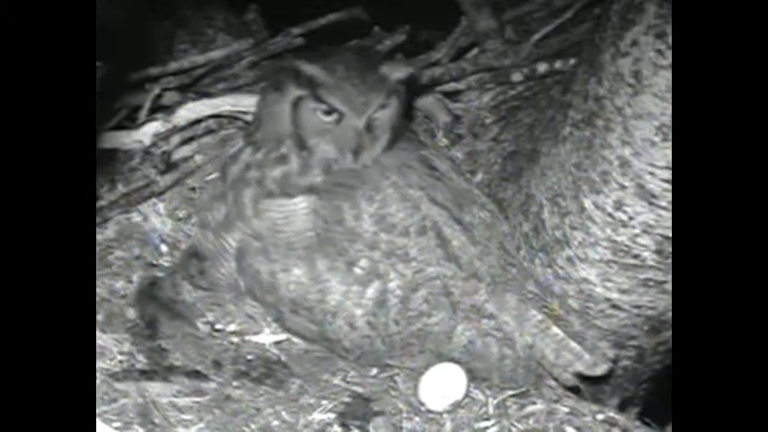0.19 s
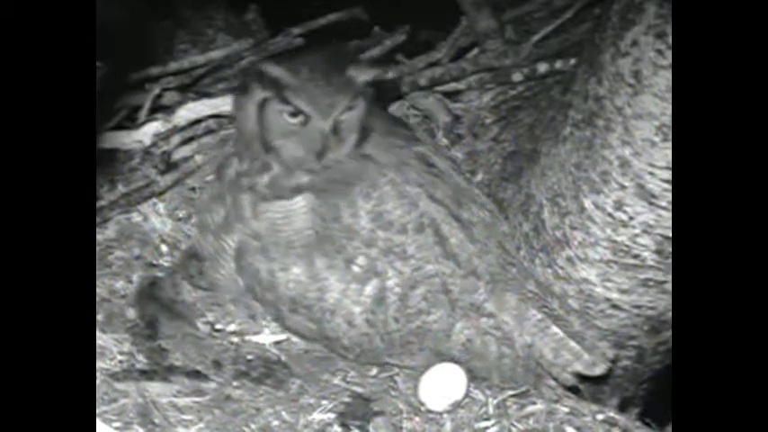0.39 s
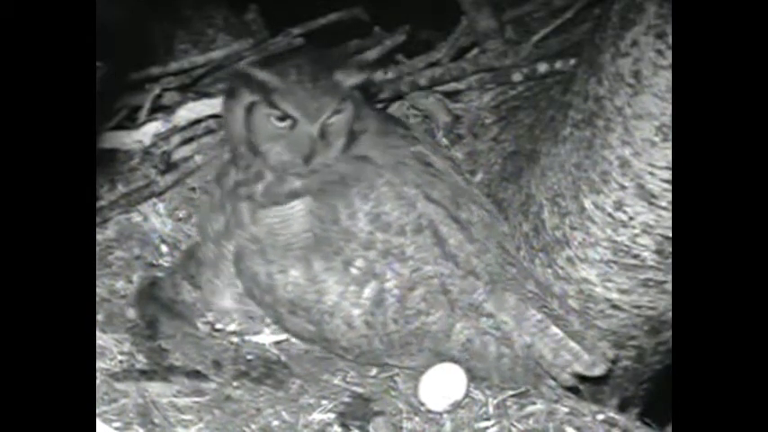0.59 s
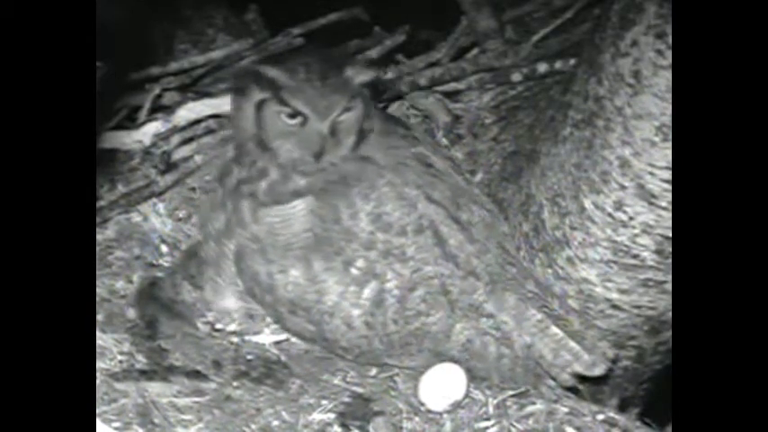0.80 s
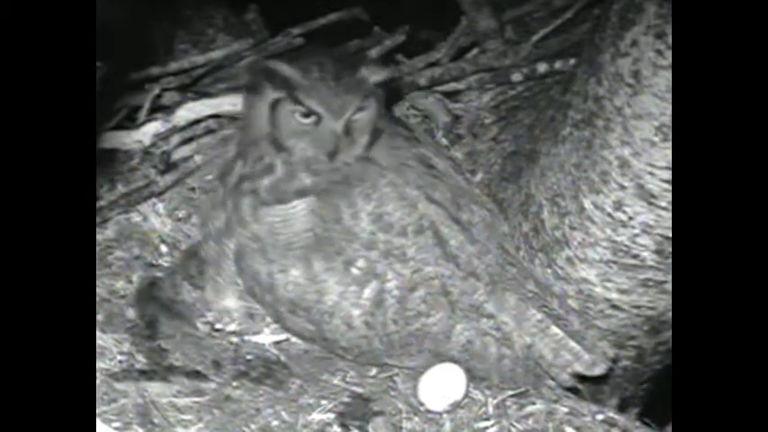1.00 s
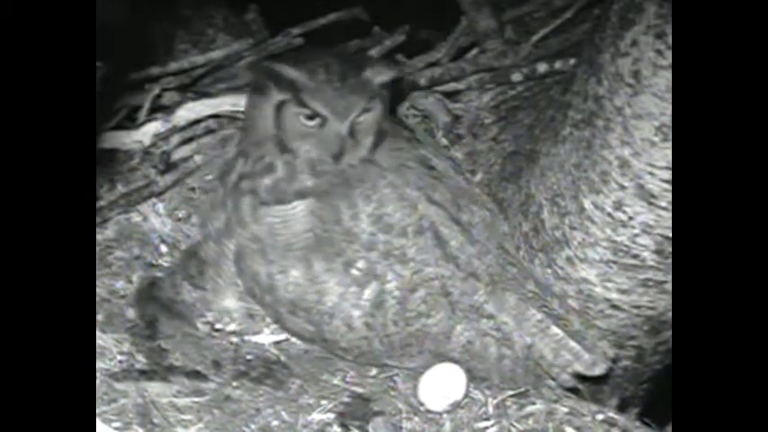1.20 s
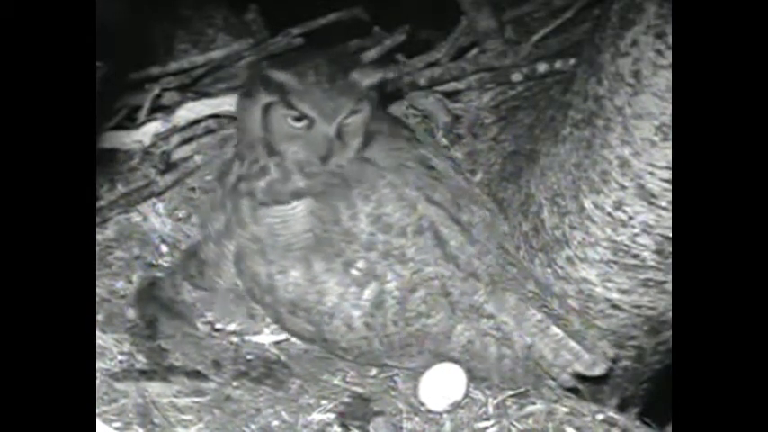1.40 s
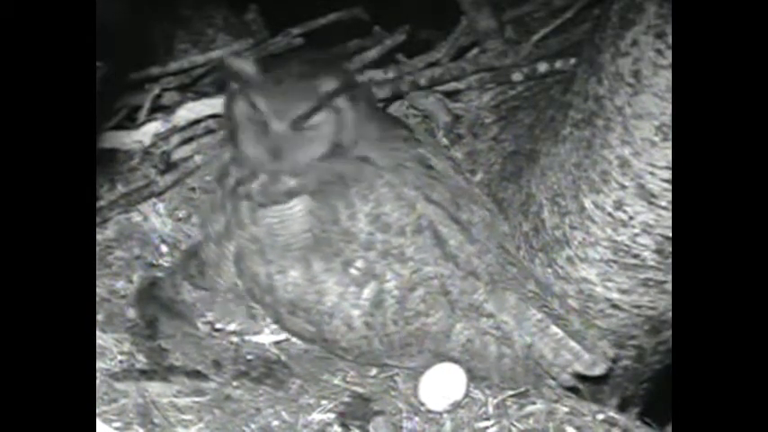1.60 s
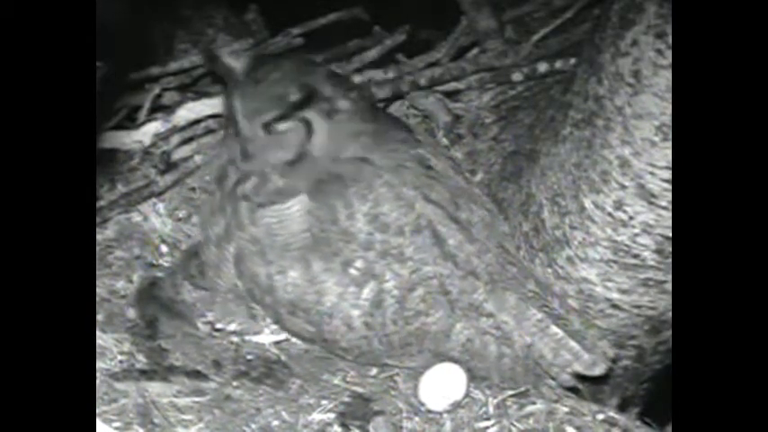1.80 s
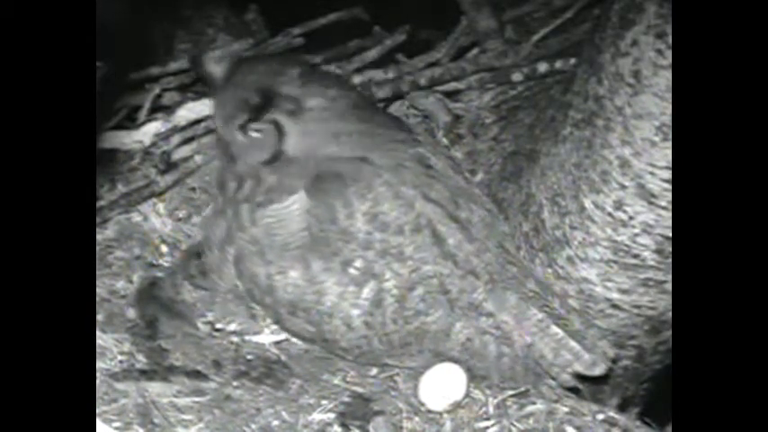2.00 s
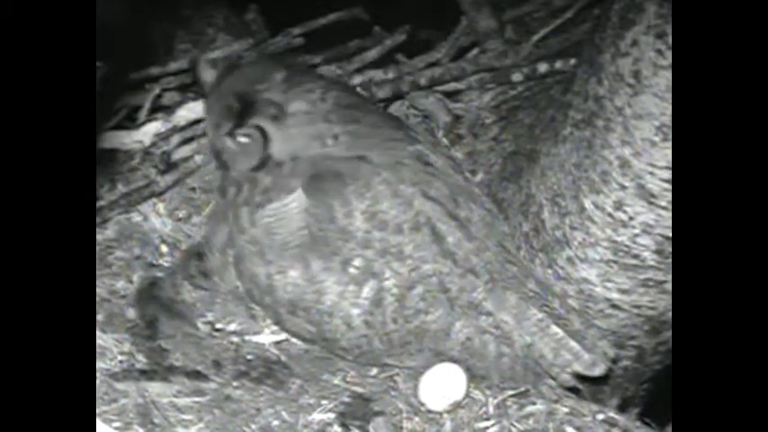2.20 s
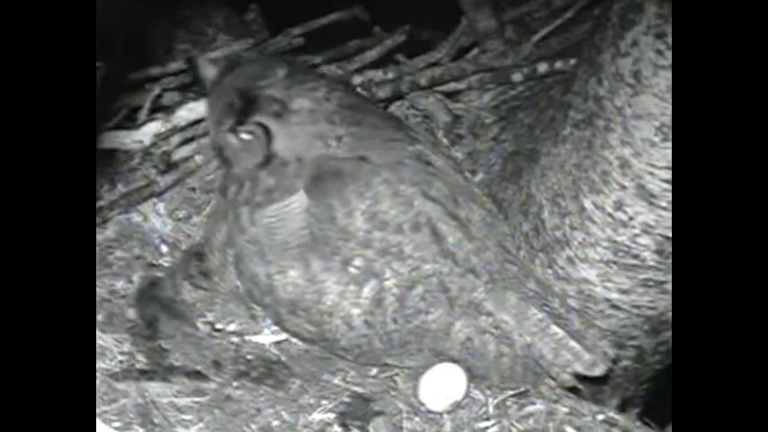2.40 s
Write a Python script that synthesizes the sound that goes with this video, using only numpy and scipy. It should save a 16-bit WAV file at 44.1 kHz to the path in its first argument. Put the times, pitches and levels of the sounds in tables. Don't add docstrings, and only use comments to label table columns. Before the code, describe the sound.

One brief soft owl hoot at a night nest, with microphone hiss, small taps and ticks

```python
import sys
import numpy as np
from scipy import signal
from scipy.fft import rfft, irfft
from scipy.io import wavfile
from scipy.ndimage import uniform_filter1d

SR = 44100
rng = np.random.default_rng(int(sys.argv[2]) if len(sys.argv) > 2 else 0)


def to_wav(s):
    ch = np.atleast_2d(s).T
    pcm = np.round(np.clip(ch, -1, 1) * 32767)
    wavfile.write(sys.argv[1], SR, pcm.astype(np.int16))


def ratio(d):
    e = np.asarray(d, float) / 20
    return 10 ** e


N = 105840

# frequency in Hz, level in dB per Hz.
WASH_SPECTRUM = [(12, -63), (20, -43.5), (54, -48), (173, -24.5), (422, 0.5), (460, -3), (527, -1.5),
                 (809, -11.5), (1200, -24.5), (1560, -69.5), (2640, -120)]
# time in seconds, wash level in dB, gust level in dB.
NIGHT_AIR = [(0, 1.5, -2), (.2, -0.5, 4.5), (.45, 4, -8), (.63, 2, 14), (.8, 1, 7), (1.05, 2, -4),
             (1.22, 1.5, 14), (1.33, -1.5, 9.5), (1.43, 5, 13.5), (1.55, 1, 7.5), (1.7, -2, 10),
             (1.9, -1, -1), (2.15, 2, -10), (2.4, -1.5, -9)]
# frequency in Hz, level in dB per Hz.
HISS_SPECTRUM = [(500, -11.5), (1000, 0), (2000, -2), (3000, -5.5), (4500, -10), (7200, -11), (8800, -17),
                 (9900, -27.5)]
# time in seconds, level in dB.
LID_ACTIVITY = [(0.0, -55), (0.28, -84), (0.44, -62.5), (0.65, -67), (1.2, -67.5), (1.59, -68.5),
                (1.85, -65), (1.92, -64), (2.4, -68)]
# start in seconds, peak in dB, pitch in Hz, length in seconds.
LID_TICKS = [(0.047, -51.5, 2370, 0.0065), (0.01, -50.5, 2330, 0.0049), (0.09, -57.5, 2390, 0.004),
             (0.13, -61, 2310, 0.0035), (0.166, -51.5, 2310, 0.0031), (0.318, -57, 2360, 0.0059),
             (0.3505, -41.5, 2336, 0.0023), (0.418, -48.5, 2110, 0.0028), (0.43, -49.5, 2250, 0.0049),
             (0.472, -49.5, 2160, 0.0043), (0.495, -52, 2270, 0.0048), (0.45, -48.5, 2360, 0.0034),
             (0.53, -62, 2300, 0.004), (0.5704, -52.5, 2420, 0.005), (0.609, -47.5, 2290, 0.007),
             (0.802, -51.5, 2390, 0.0027), (0.838, -49.5, 2310, 0.0022), (0.874, -49, 2440, 0.0021),
             (0.909, -49.5, 2210, 0.004), (1.036, -54, 2430, 0.004), (1.05, -52.5, 2430, 0.0032),
             (1.125, -55, 2310, 0.004), (1.4317, -50, 2263, 0.0065), (1.432, -56, 2490, 0.003),
             (1.462, -48.5, 2250, 0.0048), (1.505, -49, 2220, 0.0032), (1.519, -50.5, 2170, 0.0043),
             (1.605, -53, 2415, 0.004), (1.611, -43.5, 2440, 0.0017), (1.612, -48, 2600, 0.0013),
             (1.801, -50, 2090, 0.0027), (1.8915, -46.5, 2290, 0.0025), (1.976, -47, 2370, 0.0044),
             (2.033, -50, 2316, 0.0056), (2.084, -54, 2210, 0.0029), (2.1044, -50.5, 2250, 0.0041),
             (2.136, -54, 2280, 0.0037)]
# frequency in Hz, level in dB, t60 in seconds, delay in seconds.
HOUSING_MODES = [
    (355, 2.5, 0.12, 0),
    (535, 3, .07, .005),
    (440, 0, 0.05, 0),
    (290, -12, 0.04, 0),
    (666, -13, 0.04, 0),
]
# start in seconds, peak in dB, upper mode share in dB, low
# mode in Hz.
DRIPS = [
    (0.512, -29, 0, 340),
    (0.627, -33, -4, 335),
    (1.343, -35, -1, 350),
    (1.492, -33.5, 0, 352),
    (1.769, -28, -1, 372),
    (1.794, -35.5, -9, 405),
    (2.13, -28, -2, 342),
         (0.061, -40.5, 0, 380), (0.081, -45.5, -11, 429), (0.152, -40, -1.5, 607), (0.678, -43, -11, 373),
          (0.71, -38.5, -14, 359), (0.735, -43.5, -17, 362), (0.839, -49, -3, 554), (0.881, -43.5, -1, 421),
          (0.925, -36, -14, 425), (0.973, -39.5, -4, 437.5), (1.032, -39.5, -9, 424),
          (1.09, -42.5, -8, 516), (1.151, -42.5, -12, 430), (1.173, -37.5, -13, 336.5),
          (1.209, -41, -6, 381), (1.232, -41.5, -11, 430), (1.272, -40, -9, 381), (1.329, -40.5, -8, 490),
          (1.626, -47, -16, 484), (1.646, -43, -13, 480), (1.7, -48, -1, 488), (1.74, -38.5, -18, 439),
          (1.827, -48.5, 5, 560), (1.9, -48, -8, 442), (1.971, -38.5, -6, 530), (2.003, -49, -1, 526),
          (2.044, -41, -9, 538), (2.365, -43, 2, 402), (2.378, -38, -4.5, 517)]
# time in seconds, pitch in Hz, level in dB.
HOOT = [
    (.243, 436, -41),
    (.27, 415, -40),
    (.281, 405, -35.5),
    (.318, 383, -34),
    (.348, 411, -30.5),
    (.383, 408, -31),
    (.398, 423, -30.5),
    (.466, 430, -32),
    (.481, 452, -41),
]
# start in seconds, length in seconds, pitch in Hz, level in dB.
VOICE_CATCHES = [
    (.205, .034, 430, -43),
    (.481, .014, 458, -38),
    (.496, .018, 460, -41),
]


def noise():
    return rng.standard_normal(N)


def along(table, column):
    rows = np.transpose(table)
    return np.interp(np.arange(N) / SR, rows[0], rows[column])


def evened(x):
    return x / np.sqrt(np.mean(x ** 2) + 1e-20)


def coloured(x, points):
    f, db = np.transpose(points)
    log_hz = np.log(np.fft.rfftfreq(len(x), 1 / SR) + 1)
    beyond = np.maximum(log_hz - np.log(f[-1]), 0) + np.maximum(np.log(f[0]) - log_hz, 0)
    gain_db = np.interp(log_hz, np.log(f + 1), db) - 12 * beyond
    return irfft(rfft(x) * ratio(gain_db), len(x))


def high_pass(x, order, hz):
    return signal.sosfilt(signal.butter(order, hz, "high", fs=SR, output="sos"), x)


def drift(width_s):
    size = max(round(width_s * SR), 2)
    return evened(uniform_filter1d(uniform_filter1d(noise(), size), size))


def resonate(x, hz, width):
    turn = np.exp(2j * np.pi * np.cumsum(hz * np.ones(len(x))) / SR)
    r = np.exp(-np.pi * width / SR)
    return 2 * (turn * signal.lfilter([1 - r], [1, -r], x / turn)).real


def resonate_twice(x, hz, width):
    return resonate(resonate(x, hz, width), hz, width)


def ring(hz, t60, rise):
    t = np.arange(8000) / SR
    return (1 - np.exp(-t / rise)) ** 2 * ratio(-60 * t / t60) * np.sin(2 * np.pi * hz * t)


def add(mix, s, sound):
    part = mix[round(s * SR):][:len(sound)]
    part += sound[:len(part)]


def wash():
    z = signal.stft(coloured(noise(), WASH_SPECTRUM), nperseg=1024, noverlap=768)[2]
    chance = rng.standard_normal(z.T.shape).T
    patch_db = 2 * evened(uniform_filter1d(uniform_filter1d(chance, 4, 0), 10, 1))
    x = signal.istft(z * ratio(patch_db), nperseg=1024, noverlap=768)[1][:N]
    return ratio(-51.5 + along(NIGHT_AIR, 1)) * evened(x)


def gusts():
    low = high_pass(resonate_twice(noise(), hz=193.6, width=300), 3, 125)
    lumps_db = 3.5 * drift(0.01)
    return ratio(-79 + along(NIGHT_AIR, 2) + lumps_db) * evened(low)


def hiss():
    turns = np.arange(N) * 120 / SR + 1.3
    even = np.diff(np.floor(turns / 2), prepend=0)
    odd = np.diff(np.floor(turns / 2 + .5 + 0.054), prepend=0)
    spikes = even + ratio(-2.5) * odd
    puffs = signal.lfilter([1], [1, -.93], spikes) * noise()
    buzz = high_pass(coloured(puffs, HISS_SPECTRUM), 4, 6900)
    steady = evened(coloured(noise(), HISS_SPECTRUM))
    return ratio(-58 + 0.54 * drift(0.11)) * steady + ratio(-74) * evened(buzz)


def patter():
    drips_per_s, lid_hz, lid_width_hz = 260, 2310, 310
    spread_db = -4.5 * np.minimum(rng.exponential(1, (2, N)), 3)
    size = rng.standard_normal((2, N)) * ratio(spread_db)
    hits = size * (rng.random((2, N)) < drips_per_s / SR)
    response = sum(ratio(db) * ring(hz, t60, 0.0047) for hz, db, t60, _ in HOUSING_MODES)
    housing = evened(signal.oaconvolve(hits[0], response)[:N])
    lid = resonate(hits[1], lid_hz + 70 * drift(0.018), lid_width_hz)
    lid = evened(resonate(lid, lid_hz, lid_width_hz))
    return ratio(-61) * housing + ratio(-2.5 + along(LID_ACTIVITY, 1)) * lid


def ticks():
    out, t = np.zeros(N), np.arange(-1200, 1200) / SR
    u = t - 0.0033
    slowness = np.where(u < 0, 2.64, 1)
    chance = rng.standard_normal((len(LID_TICKS), 2, len(t)))
    for (s, db, hz, length), (grit, puff) in zip(LID_TICKS, chance):
        shape = np.exp(-(u / slowness / max(length, .001)) ** 2)
        grain = evened(resonate_twice(grit, hz, 350))
        wide = evened(resonate_twice(puff, 0.58 * hz, 1200))
        scrape = np.sin(2 * np.pi * hz * t) + .6 * grain + ratio(-8) * wide
        add(out, s + t[0], ratio(db - 6.5) * shape * scrape)
    return out


def knocks():
    drips = DRIPS
    out, shake = np.zeros(N), np.zeros(N)
    rattle_db, rattle_t60_s = -19, .18
    decay_db = -60 * np.arange(8000) / SR / rattle_t60_s
    chance = rng.standard_normal((len(drips), len(HOUSING_MODES)))
    for (s, db, upper_db, low_hz), c in zip(drips, chance):
        add(shake, s + 0.0052, ratio(db + rattle_db + decay_db))
        for k, (hz, mode_db, t60, late) in enumerate(HOUSING_MODES):
            mode_hz = hz * (1 + 0.016 * c[k]) if k else low_hz
            mode = ring(mode_hz, t60, .0012 + late / 3)
            level_db = db - 4 + mode_db + upper_db * (k > 0)
            add(out, s - 0.00096 + late, ratio(level_db) * mode)
    rattle = sum(ratio(db) * resonate_twice(noise(), hz, 110) for hz, db, *_ in HOUSING_MODES)
    return out + uniform_filter1d(shake, size=300) * evened(rattle)


def hoot():
    t, hz = np.arange(N) / SR, along(HOOT, 1)
    level_db = along(HOOT, 2) + .4 * drift(0.01)
    gate = np.clip(np.minimum(t - HOOT[0][0], HOOT[-1][0] - t) / .005, 0, 1)
    phase = 2 * np.pi * np.cumsum(hz + 2 * drift(0.004)) / SR
    tone = np.sqrt(2) * (np.sin(phase) + ratio(-36) * np.sin(2 * phase))
    upper = evened(resonate_twice(noise(), 3 * hz / 2, 24))
    upper = upper * ratio(-18.5) * np.exp(-((t - .36) / .04) ** 2)
    breath = evened(resonate(resonate(noise(), 1.3 * hz, 220), 1.44 * hz, 220))
    voice = gate * ratio(level_db) * (tone + upper + ratio(-21) * breath)
    for s, length, catch_hz, db in VOICE_CATCHES:
        swell = np.sin(np.pi * np.clip((t - s) / length, 0, 1))
        voice = voice + ratio(db) * np.sqrt(2) * swell * np.sin(2 * np.pi * catch_hz * t)
    return voice


def scene():
    near = high_pass(patter() + ticks() + knocks() + hoot(), 3, 237)
    return (wash() + gusts() + hiss() + near)[None]


def low_pass(x):
    return signal.sosfilt(signal.butter(12, 9890, fs=SR, output="sos"), x)


def record(dry):
    band_limit = signal.firwin(1023, 9915, window=("kaiser", 9), fs=SR)
    cut = signal.oaconvolve(dry, band_limit[None], "same")
    return low_pass(cut + ratio(-77) * rng.standard_normal(dry.shape))


dry = scene()
out = record(dry)
to_wav(out)
```